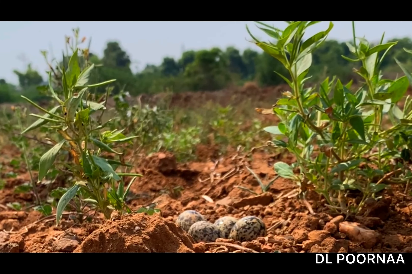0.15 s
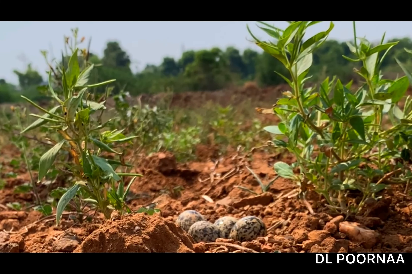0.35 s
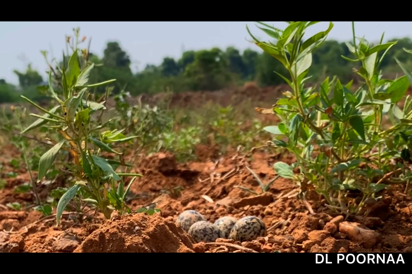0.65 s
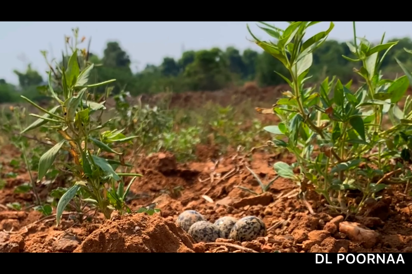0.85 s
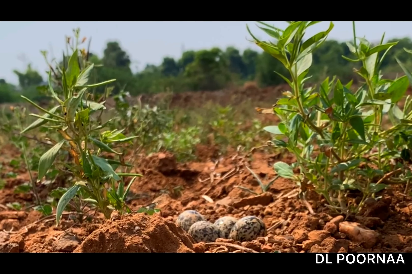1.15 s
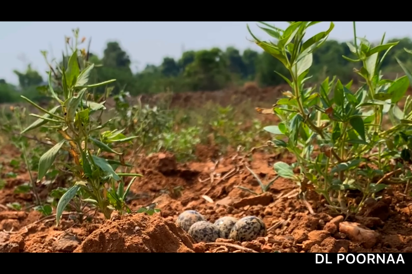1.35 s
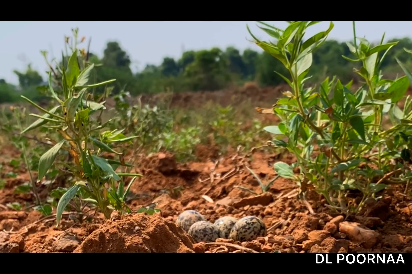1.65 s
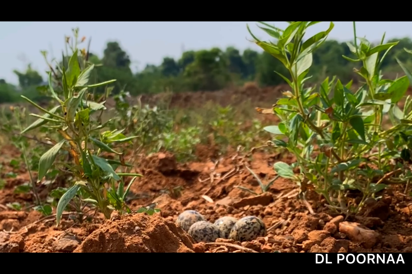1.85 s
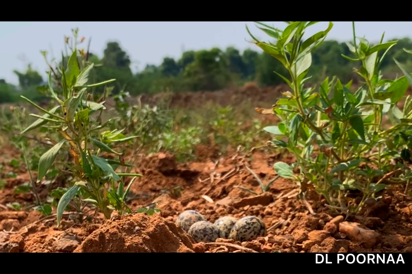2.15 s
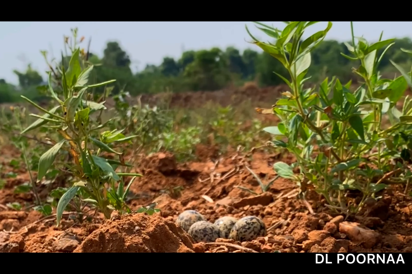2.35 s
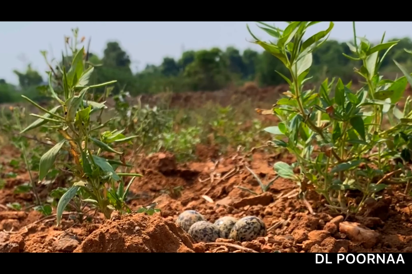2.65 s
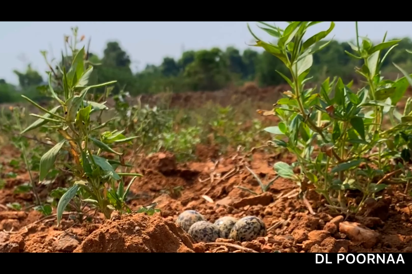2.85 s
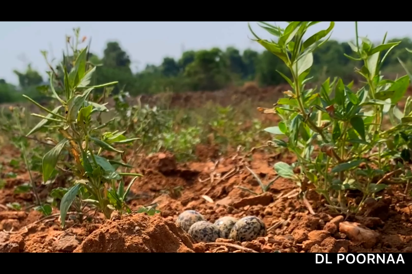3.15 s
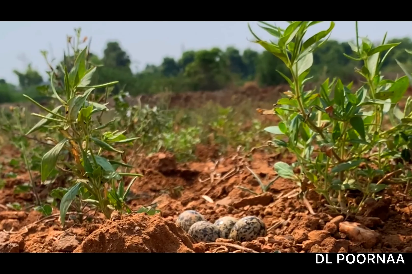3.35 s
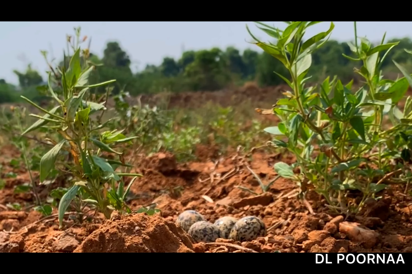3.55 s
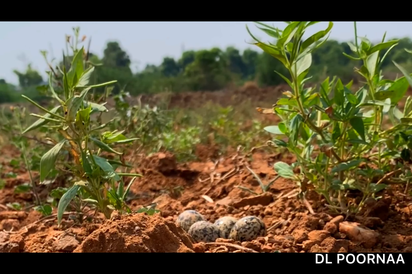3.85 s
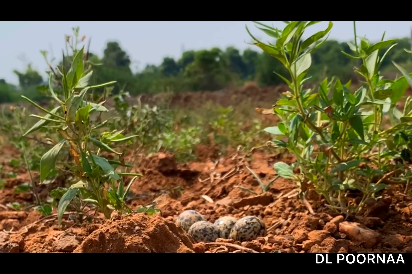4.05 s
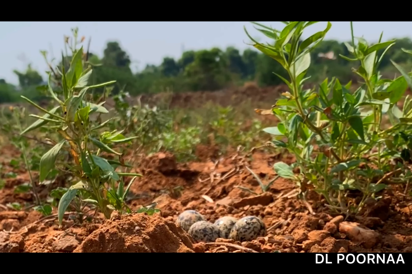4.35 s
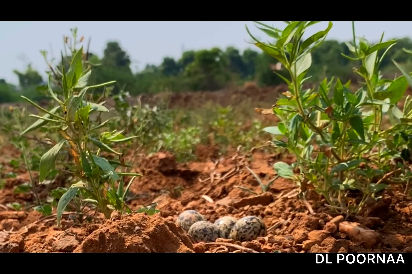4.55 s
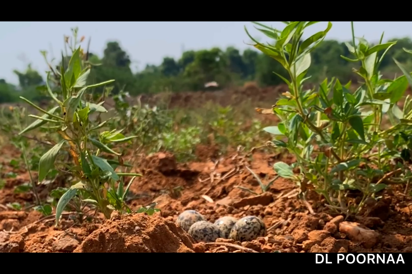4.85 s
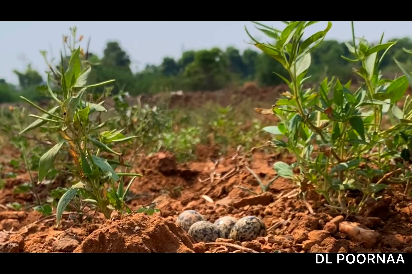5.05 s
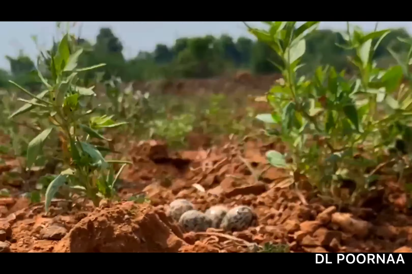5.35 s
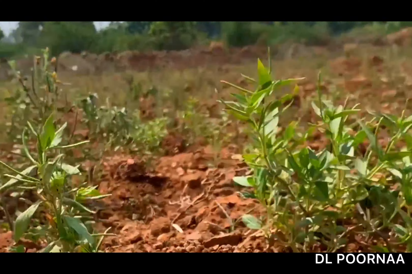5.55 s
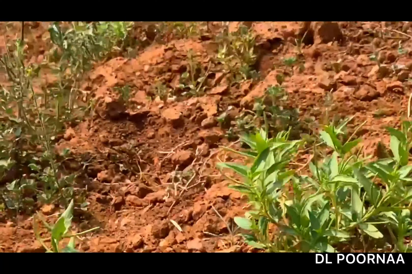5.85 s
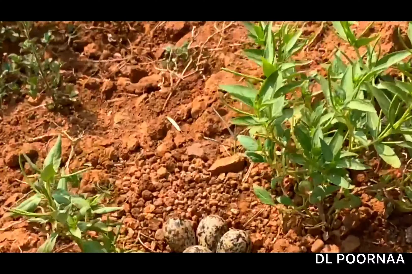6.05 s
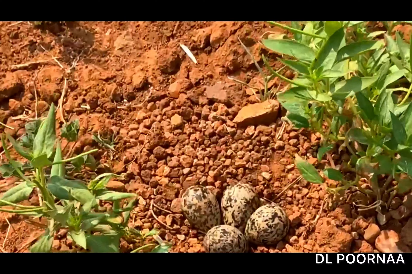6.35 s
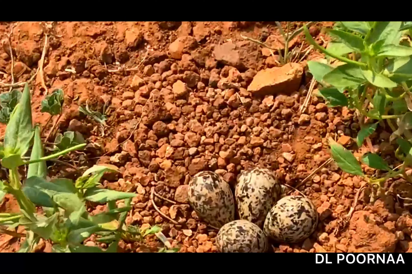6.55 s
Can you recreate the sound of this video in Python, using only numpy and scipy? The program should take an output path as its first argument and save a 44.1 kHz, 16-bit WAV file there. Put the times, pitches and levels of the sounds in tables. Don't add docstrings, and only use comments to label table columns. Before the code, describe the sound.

A handheld stereo microphone in open farmland catches soft, thudding wind pressure over a faint steady hiss. Two short bumps with dry ticks come early, close together, then only barely audible taps later. Small distant birds call in scattered clusters: quick chirrups, high descending whistles, short chips and blurred twitter, quiet and lightly echoing. Gusts come and go irregularly, strongest at the start, and no footsteps or leaf rustle stand out.

```python
import sys
import numpy as np
from scipy import signal
from scipy.io import wavfile
from scipy.ndimage import uniform_filter1d

SR = 44100
rng = np.random.default_rng(int(sys.argv[2]) if len(sys.argv) > 2 else 0)


def gain_from_db(level_db):
    decades = np.asarray(level_db, float) / 20
    return 10 ** decades


def transcribe(signal):
    frames = np.atleast_2d(signal).T
    limited = np.clip(frames, -1, 1)
    pcm = np.round(limited * 32767).astype(np.int16)
    wavfile.write(sys.argv[1], SR, pcm)


N = 295760


def unit_rms(x):
    return x / np.sqrt(np.mean(x ** 2) + 1e-20)


def read_spectrum(points, hz):
    f, value = np.transpose(points)
    return np.interp(np.log(hz + 1), np.log(f + 1), value)


def lean_gains(lean_db):
    return gain_from_db(np.array([[.5], [-.5]]) * lean_db)


def add(mix, start_s, sound, lean_db):
    part = mix[:, round(start_s * SR):][:, :len(sound)]
    part += sound[:part.shape[1]] * lean_gains(lean_db)


def resonance(x, hz, width_hz):
    pole = np.exp((2j * np.pi * hz - np.pi * width_hz) / SR)
    return signal.lfilter([1 - abs(pole)], [1, -pole], x)


def air():
    # f/Hz, level/(dB per Hz)
    mid_spectrum = [(60, -100), (160, -83.5), (250, -87), (450, -90.5), (800, -92.5), (1200, -96.5),
                    (2000, -102), (3200, -105), (5000, -109), (7500, -111), (15000, -112)]
    # f/Hz, level/(dB per Hz)
    side_spectrum = [(60, -100), (160, -91), (250, -88), (450, -93.5), (800, -96.5), (1200, -102),
                     (2000, -106), (3200, -108), (5000, -110), (7500, -111), (15000, -112)]
    # f/Hz, left minus right/dB
    port_lean = [(200, 0), (700, -2.5), (2400, -3), (4400, -0.5), (8000, 0)]
    noise = rng.standard_normal((2, N))
    hz, _, z = signal.stft(noise, SR, nperseg=1024, noverlap=768)
    patches = rng.standard_normal(z.shape[1:])
    patches = uniform_filter1d(patches, size=14, axis=0)
    patches = unit_rms(uniform_filter1d(patches, size=16, axis=1))
    patch_db = 0.94 * patches / (1 + (hz[:, None] / 2500) ** 2)
    z = z * gain_from_db(patch_db) * np.sqrt(SR / 2)
    spectra_db = np.array([read_spectrum(mid_spectrum, hz), read_spectrum(side_spectrum, hz)])
    mid, side = z * gain_from_db(spectra_db)[:, :, None]
    ports = np.array([mid + side, mid - side])
    ports = ports * lean_gains(read_spectrum(port_lean, hz))[:, :, None]
    return signal.istft(ports, SR, nperseg=1024, noverlap=768)[1][:, :N]


def hedges(x, t60, build_s):
    t = np.arange(SR // 2) / SR
    signs = rng.choice([-1., 1.], (2, len(t)))
    taps = signs * (rng.random((2, len(t))) < .04)
    tail = taps * gain_from_db(-60 * t / t60) * (1 - np.exp(-t / build_s))
    source = 0.98 * x + 0.57 * x[::-1]
    return signal.fftconvolve(source, tail / np.linalg.norm(tail[0]), axes=1)[:, :N]


def twitter():
    # t/s, length/s, centre f/Hz, level/dB, left minus right/dB
    bursts = [(.9, .17, 4200, -68, -2), (.95, .4, 3500, -64, -2), (1.08, .09, 2200, -63, -7),
              (.9, .33, 5400, -70, -4), (1.265, .045, 6900, -65, -10), (1.27, .2, 5300, -70, -4),
              (1.3, .4, 4000, -70, -1), (1.5, .26, 5300, -71, -1), (2.26, .17, 6400, -74, 2),
              (2.85, .08, 2300, -64, -8), (2.86, .1, 6000, -74, -5), (1.2, .5, 2000, -72, -3),
              (3.4, .12, 3500, -70, 4), (3.55, .2, 3300, -74, 2), (3.83, .08, 3000, -64, -2),
              (4.05, .13, 5000, -70, 0), (4.12, .4, 3650, -67.5, 0), (3.88, .12, 2300, -73, -6),
              (4.55, .32, 3500, -71, 0), (5.33, .2, 2250, -65.5, -6), (5.32, .2, 6300, -76, -6),
              (.55, .4, 3900, -73, 0), (6.38, .07, 6300, -75, 5)]
    dart_depth = .1
    out = np.zeros((2, N))
    chance = rng.standard_normal((len(bursts), SR // 2))
    chance = uniform_filter1d(chance, size=150, axis=1) * np.sqrt(150)
    for (s, length, hz, db, lean_db), dart in zip(bursts, chance):
        pitch = hz + dart_depth * hz * dart[:round(length * SR)]
        tone = np.sin(2 * np.pi * np.cumsum(pitch) / SR)
        tone = tone * signal.windows.tukey(len(pitch), .4)
        add(out, s, np.sqrt(2) * gain_from_db(db) * tone, lean_db)
    return out


def whistles(glides, bend, waver, tilt_db):
    out = np.zeros((2, N))
    chance = rng.standard_normal((len(glides), 2, 8192))
    chance = uniform_filter1d(chance, size=200, axis=2) * np.sqrt(200)
    for (s, length, start_hz, end_hz, db, lean_db), (pitch, level) in zip(glides, chance):
        u = np.linspace(0, 1, round(length * SR))
        hz = start_hz + (end_hz - start_hz) * u ** bend
        hz = hz * (1 + waver * pitch[:len(u)])
        tone = np.sin(2 * np.pi * np.cumsum(hz) / SR) * signal.windows.tukey(len(u), .5)
        level_db = db + tilt_db * np.log2(hz / hz.mean()) + 2.2 * level[:len(u)]
        add(out, s, np.sqrt(2) * gain_from_db(level_db) * tone, lean_db)
    return out


def far_notes():
    # t/s, hook length/s, level/dB
    chirrups = [
        (1.08, .014, -52),
        (1.132, .025, -54),
        (2.843, .012, -56),
        (2.862, .012, -58),
        (2.888, .07, -62),
        (2.908, .008, -60),
    ]
    # t/s, length/s, low voice f/Hz, level/dB
    twins = [(.895, .07, 5750, -73), (1.11, .04, 5650, -76), (2.26, .1, 6050, -76),
             (3.23, .045, 5750, -68.5), (3.31, .05, 6300, -77), (4.22, .08, 5800, -78),
             (4.53, .07, 5950, -78), (5.737, .025, 5600, -76), (5.763, .05, 5780, -74),
             (6.38, .06, 6000, -79)]
    # t/s, length/s, start f/Hz, level/dB
    risers = [(.96, .04, 2800, -65), (1.21, .04, 3200, -68), (1.32, .06, 3600, -66), (1.55, .03, 3300, -69),
              (1.74, .07, 3400, -70), (2.483, .008, 3300, -69), (3.86, .03, 2500, -69),
              (3.9, .07, 3400, -70), (4.175, .035, 2900, -63), (4.31, .03, 3300, -69),
              (4.43, .035, 3200, -69), (4.57, .025, 3300, -70), (5.51, .07, 3300, -70)]
    # t/s, start f/Hz, level/dB
    chips = [(2.115, 5100, -71), (2.168, 5500, -71), (2.184, 5200, -68), (2.442, 4100, -67),
             (2.455, 4200, -68), (2.492, 5100, -68), (2.506, 5000, -70), (2.79, 4000, -70),
             (3.14, 4500, -68), (3.875, 4100, -65), (4.74, 4500, -71), (6.36, 5000, -77)]
    # t/s, length/s, f/Hz, level/dB, left minus right/dB
    held = [(0, .04, 7100, -77, -8), (1.15, .05, 4200, -71, -3), (1.102, .008, 1750, -59, -11),
            (1.21, .05, 1920, -72, -3), (1.58, .085, 3870, -67.5, 0), (2.05, .015, 4720, -71, -12),
            (2.245, .015, 5300, -74, 3), (2.425, .012, 3800, -70, 12), (2.51, .03, 3850, -71, 6),
            (2.6, .05, 3350, -78, 12), (2.92, .05, 5200, -75, -2), (3.295, .03, 4620, -71, -12),
            (3.97, .05, 2800, -77, -8), (3.97, .07, 4200, -71, -5), (4.36, .08, 4230, -74, -4),
            (4.5, .02, 5250, -74, -2), (4.68, .035, 2400, -73, 1), (4.722, .022, 4620, -69, 10),
            (5.04, .04, 4600, -74, -12), (5.12, .11, 2300, -77, -12), (5.375, .04, 2300, -64, -6),
            (5.57, .07, 3780, -71, 0), (5.64, .14, 3740, -76, 4), (5.8, .08, 2450, -74, -2)]
    stroke_s, stroke_db, chirrup_lean_db = .013, -3, -10
    foot_hz, top_hz, hook_hz = 1950, 3400, 3150
    glides = [(s, stroke_s, foot_hz, top_hz, db + stroke_db, chirrup_lean_db) for s, _, db in chirrups]
    glides += [(s + stroke_s, hook_s, top_hz, hook_hz, db, chirrup_lean_db) for s, hook_s, db in chirrups]
    for voice_ratio in (1, 1.155):
        glides += [(s, length, voice_ratio * hz, voice_ratio * hz, db, 0) for s, length, hz, db in twins]
    glides += [(s, length, hz, 3720, db, 0) for s, length, hz, db in risers]
    glides += [(s, .012, hz, .83 * hz, db, 8) for s, hz, db in chips]
    glides += [(s, length, hz, 1.01 * hz, db, lean_db) for s, length, hz, db, lean_db in held]
    return glides


def birds():
    # t/s, length/s, start f/Hz, level/dB, left minus right/dB
    sweeps = [
        (1.274, 0.083, 7100, -68, -20),
        (1.44, 0.052, 6870, -63.5, -12),
        (3.811, 0.13, 7180, -73, -20),
        (3.984, 0.045, 6850, -63, -13),
        (4.602, 0.059, 6870, -71.5, 15),
        (5.295, .085, 7380, -70, -14),
        (5.447, .035, 7000, -67.5, -7),
        (6.16, 0.059, 6430, -71.5, 8),
        (6.585, 0.11, 7200, -69.5, -16),
        (0.278, 0.052, 6960, -77, 16),
    ]
    fall = .77
    falls = [(s, length, hz, fall * hz, db, lean_db) for s, length, hz, db, lean_db in sweeps]
    near = whistles(falls, bend=1.4, waver=.004, tilt_db=-12)
    far = whistles(far_notes(), bend=.8, waver=.011, tilt_db=14)
    near = gain_from_db(-1.5) * near + gain_from_db(-1) * hedges(near, t60=.45, build_s=.008)
    far = gain_from_db(-.5) * far + gain_from_db(-5) * hedges(far, t60=.45, build_s=.006)
    return near + far + gain_from_db(-1) * hedges(twitter(), t60=.3, build_s=.003)


def grit_ticks():
    # t/s, peak level/dB, left minus right/dB, centre f/Hz, width/Hz
    ticks = [(.371, -61, 3, 5000, 4000), (0.382, -42.5, -11, 5550, 4940), (0.3817, -35, -10, 1800, 920),
             (0.3827, -39.5, 13, 955, 600), (.441, -50, -4, 4500, 6000), (.453, -51, 25, 3500, 4000),
             (0.4615, -46, 4, 5500, 3500), (0.48, -51, 15, 5460, 3500), (.5005, -56, 8, 6500, 4500),
             (0.6902, -43, -12, 3400, 1190), (0.6904, -33.5, -7, 1650, 670), (.6905, -53, 4, 7000, 3500),
             (.709, -56, 6, 5500, 3000), (0.749, -48.5, 8, 5360, 3000), (0.792, -54, 8, 3000, 3000)]
    out = np.zeros((2, N))
    t = np.arange(400) / SR
    grit = rng.standard_normal((len(ticks), len(t)))
    for (s, db, lean_db, hz, width_hz), grains in zip(ticks, grit):
        burst = grains * np.exp(-t / 0.00063)
        tick = resonance(resonance(burst, hz, width_hz), hz, 3 * width_hz).real
        add(out, s, gain_from_db(db) * tick / abs(tick).max(), lean_db)
    return out


def knocks():
    # t/s, left peak/full scale, right peak/full scale, f/Hz, t60/s
    thumps = [(0.366, -0.1, -0.15, 70.6, 0.1), (.382, -0.16, -0.21, 396, 0.0039),
              (0.3887, 0.05, -0.18, 340, 0.0035), (.4045, -0.0033, 0.048, 283, 0.018),
              (.441, -0.000079, -0.066, 330, 0.009), (0.6929, -0.035, -0.083, 290, 0.017),
              (.6955, -0.0058, .02, 560, .02), (.693, 0.0098, 0.033, 850, 0.0063),
              (0.699, -0.31, -0.17, 130, 0.05), (0.7006, 0.048, -0.75, 94, 0.041),
              (0.7261, 0.13, 0.091, 111, 0.054), (0.7579, -0.037, -0.068, 440, 0.0058),
              (0.7796, -0.15, -0.17, 90, 0.028), (0.792, .006, -.012, 395, .03),
              (2.2535, .002, -.014, 375, 0.032), (5.7632, 0.00025, -.028, 376, 0.014),
              (5.764, -.002, -0.0116, 684, 0.021)]
    out = np.zeros((2, N))
    t = np.arange(4096) / SR
    fade = np.cos(np.pi / 2 * t / t[-1])
    for s, left, right, hz, t60 in thumps:
        onset = 1 - np.exp(-t * hz * 4)
        decay = gain_from_db(5.5 - 60 * t / t60)
        wave = np.sin(2 * np.pi * hz * t) * onset * decay * fade
        out[:, round(s * SR):][:, :len(t)] += np.outer([left, right], wave)
    return out


def handling():
    stiffness = signal.butter(1, 30, "high", fs=SR, output="sos")
    return signal.sosfilt(stiffness, grit_ticks() + knocks())


def wind():
    # centre f/Hz, width/Hz
    lumps = [
        (47.4, 25.5),
        (79.3, 80),
        (22, 44),
        (85.5, 45),
    ]
    calm_levels = [-46, -52, -43.5, -48.5]
    # t/s, half length/s, rumble level/dB, buffet level/dB
    gusts = [(0.0, 0.16, -39.5, -69), (0.176, .04, -36.5, -47.5), (0.297, 0.019, -33.5, -33),
             (0.397, .09, -32.5, -31.5), (0.709, 0.04, -28.5, -32.5), (0.805, 0.094, -34, -37),
             (1.121, 0.077, -37.5, -45), (1.344, 0.034, -41, -48), (1.6, 0.2, -45, -53.5),
             (1.929, 0.046, -35, -46), (2.052, .05, -41, -51), (2.257, 0.048, -33.5, -41),
             (2.643, 0.048, -36, -63), (2.998, 0.031, -38.5, -57), (3.225, 0.062, -37.5, -39),
             (3.422, 0.049, -35.5, -71), (3.647, 0.1, -39.5, -45), (0.527, 0.061, -36, -50),
             (4.226, 0.18, -41.5, -57), (4.443, 0.064, -36, -40), (0.936, 0.028, -35, -43),
             (4.644, 0.049, -35.5, -43), (4.794, 0.054, -34.5, -43), (5.036, 0.08, -37, -42.5),
             (5.188, 0.035, -31.5, -42.5), (5.3, .04, -37.5, -48), (5.45, 0.09, -42.5, -52),
             (5.853, 0.42, -43.5, -68), (6.395, 0.041, -39.5, -50), (6.7, 0.016, -43, -34.5)]
    s, half, rumble_db, buffet_db = np.transpose(gusts)
    gust_levels = rumble_db, buffet_db, rumble_db - 17, buffet_db + 6
    t = np.arange(0, N + 64, 64) / SR
    swell = np.exp(-2 * ((t[:, None] - s) / half) ** 2)
    noise = rng.standard_normal((len(lumps), N + SR))
    parts = []
    for x, (hz, width_hz), gust_db, calm_db in zip(noise, lumps, gust_levels, calm_levels):
        lump = resonance(resonance(x, hz, width_hz), hz, width_hz)
        lump = resonance(lump, hz, 2 * width_hz)[SR:]
        size_by_chance = abs(lump) + 0.23 * abs(lump).mean()
        lump = lump / size_by_chance ** 0.49
        size = np.sqrt(swell @ gain_from_db(2 * gust_db) + gain_from_db(2 * calm_db))
        parts.append(np.interp(np.arange(N) / SR, t, size) * unit_rms(lump.real))
    shared, opposed = parts[0] + parts[1], parts[2] + parts[3]
    vent = signal.butter(3, 32.7, "high", fs=SR, output="sos")
    shared = signal.sosfilt(vent, shared)
    flutter_hz, flutter_width_hz, flutter_db = 22.3, 22, -54.5
    flutter = resonance(rng.standard_normal(N), flutter_hz, flutter_width_hz)
    flutter = resonance(flutter, flutter_hz, flutter_width_hz).real
    shared = shared + gain_from_db(flutter_db) * unit_rms(flutter)
    return np.array([shared + opposed, shared - opposed])


def scene():
    return air() + birds() + handling() + wind()


def low_pass(x):
    return signal.sosfilt(signal.butter(12, 16620, fs=SR, output="sos"), x)


def record(dry):
    drift_cut = signal.butter(1, 9, "high", fs=SR, output="sos")
    top_cut = signal.firwin(1023, 15740, window=("kaiser", 10), fs=SR)
    mix = signal.sosfilt(drift_cut, dry)
    mix = signal.oaconvolve(mix, top_cut[None], "same")
    return low_pass(mix)


dry = scene()
out = record(dry)
transcribe(out)
```